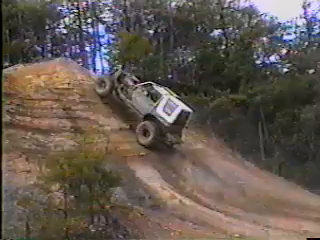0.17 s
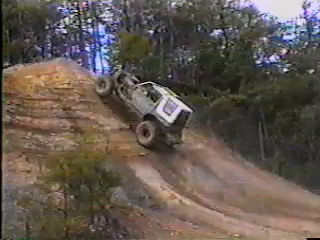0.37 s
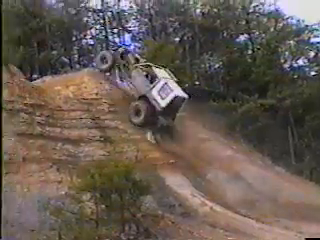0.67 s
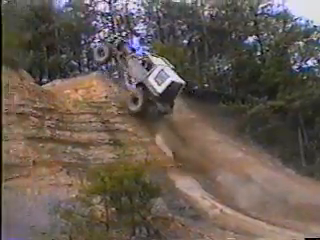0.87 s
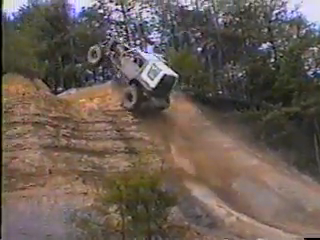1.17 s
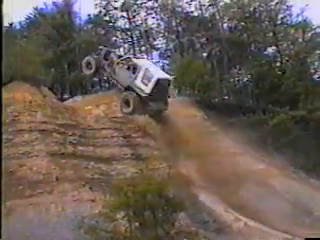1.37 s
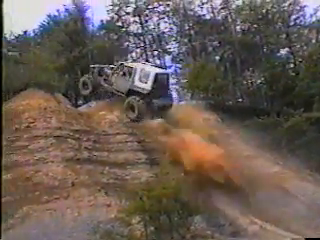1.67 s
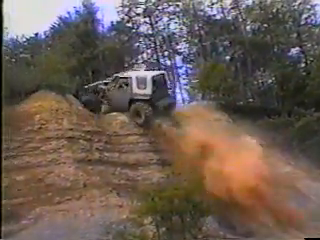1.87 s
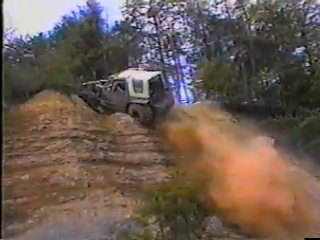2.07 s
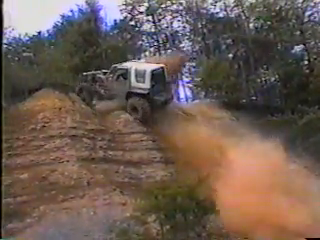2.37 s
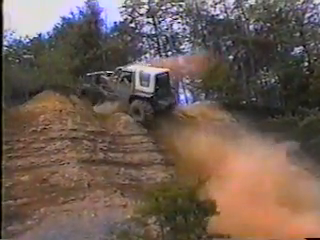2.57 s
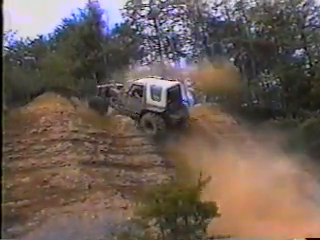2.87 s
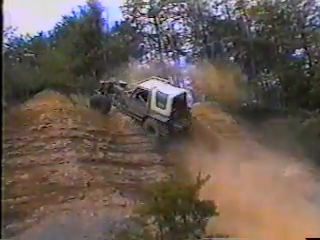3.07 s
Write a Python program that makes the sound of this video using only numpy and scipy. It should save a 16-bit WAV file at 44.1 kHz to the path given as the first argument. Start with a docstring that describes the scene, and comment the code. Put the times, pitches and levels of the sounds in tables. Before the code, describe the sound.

An off-road vehicle engine revs hard up a dirt hill, raspy and howling over the hiss of tyres spraying dirt. It eases, blips, pops and roars again, heard outdoors through a distant, slightly overloaded microphone.

```python
"""V8 off-roader on a dirt hill.

It climbs at full throttle, eases at the crest, blips, pops on the overrun and roars again.
Firings rasp and howl through an open exhaust pipe whose note rises with gas heat; tyres throw dirt.
Hillside and trees scatter the sound to a distant, overloaded mono microphone."""
import sys
import numpy as np
from scipy import signal
from scipy.fft import rfft, irfft, next_fast_len
from scipy.io import wavfile
from scipy.ndimage import uniform_filter1d, map_coordinates

SR = 44100
rng = np.random.default_rng(int(sys.argv[2]) if len(sys.argv) > 2 else 0)


def generate_wav(sig):
    """Save sig (samples, or channels by samples) to the path in sys.argv[1] as 16-bit PCM at SR."""
    pcm = np.round(np.clip(np.atleast_2d(sig).T, -1, 1) * 32767).astype(np.int16)
    wavfile.write(sys.argv[1], SR, pcm)


N = 141561

# four-stroke cycle rate: time_s, rate_hz
CYCLE_HZ = [(.05, 43.2), (.14, 42.9), (.21, 45.5), (.29, 47.8), (.38, 48.7), (.45, 48.6), (.54, 46.9),
            (.69, 45.9), (.76, 42.9), (.82, 42), (.89, 44), (.95, 48), (1.0, 53), (1.1, 55.6), (1.23, 54.6),
            (1.33, 56), (1.43, 55.4), (1.54, 51.8), (1.69, 39), (1.76, 41), (1.86, 43.3), (1.93, 43.6),
            (2.03, 42.2), (2.22, 40), (2.38, 42.5), (2.8, 32), (2.96, 38.8), (3.2, 45)]
# nominal lowest pipe resonance: time_s, pitch_hz
LOW_MODE_HZ = [(.05, 725), (.14, 770), (.22, 755), (.28, 720), (.43, 755), (.6, 715), (.8, 685), (.95, 630),
               (1.2, 590), (1.4, 615), (1.55, 590), (1.68, 545), (1.78, 620), (1.9, 705), (2.05, 650),
               (2.2, 610), (2.86, 550), (3.2, 630)]


def amp(db):
    """Decibels to gain."""
    return 10 ** (np.asarray(db) / 20)


def unit(x):
    """Scale to rms 1."""
    return x / np.sqrt(np.mean(x ** 2) + 1e-20)


def curve(rows):
    """One value per sample from rows of time_s, value."""
    return np.interp(np.arange(N) / SR, *np.transpose(rows))


def wobble(knots_per_s):
    """Smooth random curve."""
    return map_coordinates(rng.standard_normal(2048), [np.arange(N) * knots_per_s / SR], mode="wrap")


def filtered(x, response):
    """Apply a gain given as a function of frequency in Hz."""
    size = next_fast_len(N + 8192)
    return irfft(rfft(x, size) * response(np.fft.rfftfreq(size, 1 / SR)), size)[:N]


def coloured(x, spectrum):
    """Filter by rows of freq_hz, gain_db."""
    hz, db = np.transpose(spectrum)
    return filtered(x, lambda f: amp(np.interp(np.log(f + 1), np.log(hz), db)))


def noise(spectrum):
    """Coloured noise, rms 1."""
    return unit(coloured(rng.standard_normal(N), spectrum))


def steady(x, size=4001):
    """Level slow swells to rms 1."""
    power = uniform_filter1d(uniform_filter1d(x ** 2, size), size)
    return x / np.sqrt(np.abs(power) + 1e-12)


def order_tone(order, cycles, flutter_db=4.0, slip_rad=0.63):
    """One multiple of the cycle rate, unsteady in level and phase."""
    level = amp(flutter_db * wobble(13))
    return level * np.sin(2 * np.pi * (order * cycles + rng.random()) + slip_rad * wobble(30))


def hillside(x, count=27, t60_s=0.056, crossfade_s=0.12, echo_db=6.5):
    """Banks and trunks add a short, dense scatter that changes as the vehicle moves."""
    age_s = np.arange(SR // 6) / SR
    place = np.arange(N) / SR / crossfade_s
    tails = rng.standard_normal((count, len(age_s))) * amp(-60 * age_s / t60_s)
    echo = 0
    for k, tail in enumerate(tails):
        share = np.sqrt(np.maximum(1 - np.abs((place - k) % count - 1), 0))
        echo += signal.fftconvolve(x * share, tail / np.linalg.norm(tail))[:N]
    return x + amp(echo_db) * echo


def tyres(grit_per_s=260, grit_db=-20.5):
    """Spinning tyres spray dirt: hiss with clicks of grit."""
    # spray envelope: time_s, level_db
    spray_db = [(.06, -26), (.44, -26), (.52, -29.5), (.7, -29), (1.06, -26.5), (1.2, -25.5), (1.38, -26),
                (1.6, -27.5), (1.98, -25.5), (2.14, -34), (2.25, -33.5), (2.31, -38), (2.4, -30.5),
                (2.46, -37), (2.72, -37), (2.82, -34), (2.89, -26.5), (3.0, -28), (3.2, -27.5)]
    # spray colour: freq_hz, gain_db
    spectrum = [(100, -40.5), (300, -13), (1000, -9.5), (2000, -3), (3200, 0.5), (3800, -2.5), (4600, -0.5),
                (5000, -4.5), (5500, -13.5), (6400, -17.5), (7500, -28)]
    grit = (rng.random(N) < grit_per_s / SR) * rng.standard_normal(N)
    spray = rng.standard_normal(N) + amp(grit_db) * unit(hillside(grit))
    return unit(coloured(spray, spectrum)) * amp(curve(spray_db) + 1 + 0.7 * wobble(30.36))


def drone(cycles, rough):
    """Low engine orders, dissolving into rumble as firing gets uneven."""
    # low exhaust tones: order, level_db
    orders = [(4, -22.5), (5, -2), (6, -1.5), (7, -8.5), (8, 3), (9, -11), (10, -4), (12, -5.5)]
    # drone envelope: time_s, level_db
    drone_db = [(.06, -37.5), (.26, -40.5), (.37, -36), (.52, -42.5), (.9, -38.5), (1.29, -38.5),
                (1.58, -45), (1.77, -40.5), (2.0, -41.5), (2.2, -46.5), (2.36, -37), (2.5, -46), (2.7, -43),
                (3.0, -33), (3.2, -32.5)]
    # rumble colour: freq_hz, gain_db
    spectrum = [(30, -23), (65, -24.5), (105, -10), (150, -12), (210, -4.5), (300, 0.5), (500, -5),
                (1000, -6), (3000, -27)]
    tones = amp(-1) * unit(sum(amp(db) * order_tone(order, cycles) for order, db in orders))
    rumble = amp(-0.5) * noise(spectrum)
    return 2 * amp(curve(drone_db)) * ((1 - rough) * tones + rough * rumble)


def pops(attack_s=0.0017, t60_s=0.058):
    """Unburnt fuel cracks while the throttle is shut."""
    # overrun pops: start_s, level_db
    cracks = [(2.585, -39), (2.636, -31.5), (2.681, -32.5), (2.724, -34), (2.75, -32.5), (2.76, -28.5)]
    # pop colour: freq_hz, gain_db
    spectrum = [(100, -30.5), (400, -16), (1300, 1), (1600, 1.5), (1800, 10.5), (2050, -7), (2800, 4.5),
                (3350, 3.5), (3750, 3), (4800, -2), (5600, -2.5), (7500, -47)]
    envelope = np.zeros(N)
    for start_s, db in cracks:
        age_s = np.maximum(np.arange(N) / SR - start_s, 0)
        envelope += amp(db - 60 * age_s / t60_s) * (1 - np.exp(-age_s / attack_s))
    return 2 * envelope * noise(spectrum)


def wails(flutter_db=3, slip_rad=0.8):
    """Brief, ragged exhaust tones as the load changes."""
    # gliding tones: start_s, length_s, start_hz, end_hz, level_db
    glides = [(0.605, 0.2, 905, 785, -29.5), (0.771, .28, 1000, 898, -32), (1.029, .11, 800, 793, -28),
              (1.247, 0.19, 770, 800, -28.5), (1.718, 0.0484, 2220, 2456, -22.5),
              (2.733, 0.052, 1030, 990, -39), (2.771, 0.11, 462, 444, -35), (2.841, 0.22, 550, 603, -31),
              (2.825, 0.161, 1020, 1090, -33.5), (2.929, .24, 1240, 1350, -35)]
    out = np.zeros(N)
    for start_s, length_s, start_hz, end_hz, db in glides:
        progress = np.clip((np.arange(N) / SR - start_s) / length_s, 0, 1)
        turns = np.cumsum(start_hz + (end_hz - start_hz) * progress) / SR
        envelope = amp(db + flutter_db * wobble(120)) * np.sin(np.pi * progress)
        out += envelope * np.sin(2 * np.pi * turns + slip_rad * wobble(90))
    return out


def howl(cycles, width_hz=95):
    """Engine orders stand out as they cross the pipe's lowest resonance."""
    # howling tones: order, level_db
    orders = [(11, 3), (12, -6), (13, -9), (14, -2), (15, 7), (16, 4), (17, 3.5), (18, 6), (19, -3)]
    # howl envelope: time_s, level_db
    howl_db = [(.05, -31), (.15, -26), (.24, -30.5), (.31, -37), (.41, -30), (.5, -34), (.68, -30),
               (.8, -24.5), (.9, -37), (1.04, -38), (1.17, -41), (1.26, -34), (1.38, -30.5), (1.5, -36),
               (1.58, -42), (1.7, -39), (1.77, -28.5), (1.84, -34), (1.91, -31.5), (2.02, -37), (2.13, -41),
               (2.26, -50), (2.6, -58), (2.9, -46), (3.2, -39)]
    cycle_hz, mode_hz = curve(CYCLE_HZ), curve(LOW_MODE_HZ)
    tones = 0
    for order, db in orders:
        detuning = 2 * (order * cycle_hz - mode_hz) / width_hz
        tone = order_tone(order, cycles, flutter_db=3.0, slip_rad=0.56)
        tones += amp(db) * tone / np.hypot(1, detuning)
    return steady(tones) * amp(curve(howl_db))


def firings(cycles, rough, jitter=0.098, puff_depth=0.31):
    """One pressure pulse and one puff of turbulent gas per firing."""
    # cylinders in firing order: level_db, delay_intervals
    cylinders = [(-10.5, 0.0041), (-7, 0.088), (-1.5, -0.054), (-6.5, 0.07), (-19.5, -0.052), (-3.5, .04),
                 (-3, 0.163), (-6, -0.091)]
    count = len(cylinders)
    turns = cycles * count
    index = np.arange(int(cycles[-1] * count))
    level_db, delay = np.array(cylinders)[index % count].T
    timing_scatter, level_scatter = rng.standard_normal((2048, 2))[index].T
    due = np.interp(index + delay, turns, np.arange(N)).astype(int)
    onsets = np.interp(index + delay + jitter * rough[due] * timing_scatter, turns, np.arange(N))
    sizes = amp(level_db + 0.51 * level_scatter)
    taps = onsets.astype(int)[:, None] + np.arange(-7, 9)
    shapes = sizes[:, None] * np.sinc(taps - onsets[:, None])  # band-limited pulses
    pulses = np.bincount(taps.clip(0, N - 1).ravel(), shapes.ravel(), N)
    turbulence = rng.standard_normal(N) * np.interp(turns, index, sizes)
    puffs = turbulence * (1 + puff_depth * np.cos(2 * np.pi * turns))
    return np.sqrt(1 - rough) * unit(pulses) + np.sqrt(rough) * unit(puffs)


def resonance(x, centre_hz, width_hz):
    """One pipe mode with a moving centre."""
    carrier = np.exp(2j * np.pi * np.cumsum(centre_hz) / SR)
    pole = np.exp(-np.pi * width_hz / SR)
    return (signal.lfilter([1 - pole], [1, -pole], x / carrier) * carrier).real


def pipe_ring(gas, cycles, swing=0.03, wander=0.0063):
    """Upper pipe modes; their note swings with each cycle's surge of gas."""
    # mode spacing: time_s, pitch_hz
    spacing_hz = [(.05, 674), (.4, 695), (.7, 700), (.88, 704), (1.0, 719), (1.11, 712), (1.21, 622),
                  (1.32, 720), (1.43, 714), (1.53, 706), (1.66, 574), (1.74, 572), (1.8, 693), (1.92, 720),
                  (2.03, 689), (2.25, 614), (2.4, 616), (2.87, 527), (3.0, 592), (3.2, 689)]
    # upper modes: note_multiple, width_hz, level_db
    modes = [(2.02, 178, -3), (3.08, 84, 3.5), (3.95, 138, 1)]
    # mode near 1.4 kHz: time_s, gain_db
    bark_db = [(.05, -1), (.25, 2), (.5, -7.5), (.7, 2.5), (.9, -8), (1.05, -4.5), (1.3, 6), (1.5, -3),
               (1.9, -3), (3.2, -6)]
    # mode near 2.8 kHz: time_s, gain_db
    snarl_db = [(.05, 1.5), (.55, 2.5), (.82, 0), (1.0, -1), (1.15, 2), (1.3, 2), (1.47, 3.5), (1.7, -2),
                (1.82, 1.5), (2.0, 4), (2.3, 1), (3.2, -1.5)]
    # ring colour: freq_hz, gain_db
    spectrum = [(200, -42.5), (700, -26.5), (1300, 0.5), (3200, -2), (4500, -6), (6000, -23)]
    note_hz = curve(spacing_hz) * (1 + swing * np.sin(2 * np.pi * cycles) + wander * wobble(76))
    swell_db = [curve(bark_db), 0, curve(snarl_db)]
    ring = 0
    for k, (multiple, width_hz, db) in enumerate(modes):
        ring += (-1) ** k * amp(db + swell_db[k]) * resonance(gas, multiple * note_hz, width_hz)
    return steady(coloured(ring, spectrum))


def pipe_boom(gas):
    """Firings drive the lowest pipe mode, just below its nominal pitch."""
    # boom envelope: time_s, level_db
    boom_db = [(.06, -28), (.15, -30.5), (.3, -32), (.42, -28.5), (.53, -29.5), (.79, -39), (.92, -27.5),
               (1.08, -28), (1.17, -32.5), (1.35, -27), (1.55, -35), (1.68, -35.5), (1.77, -27.5),
               (1.86, -36), (2.0, -40.5), (2.2, -47), (2.34, -35), (2.48, -47), (2.62, -43.5), (2.8, -46),
               (2.9, -34), (3.2, -33.5)]
    # boom colour: freq_hz, gain_db
    spectrum = [(200, -26.5), (400, -12.5), (600, -6), (800, -11), (1100, -5), (1600, -24.5), (3000, -41)]
    boom = resonance(gas, 0.937 * curve(LOW_MODE_HZ), width_hz=160)
    return steady(coloured(boom, spectrum)) * amp(curve(boom_db) - 3.5)


def exhaust(cycles, rough):
    """Firings rasp through the open pipe and ring it; uneven firing favours the rasp."""
    # rasp and ring envelope: time_s, level_db
    throttle_db = [(.06, -26), (.3, -26), (.45, -26.5), (.6, -30.5), (.75, -26), (.88, -26), (.98, -24.5),
                   (1.09, -26), (1.19, -34.5), (1.32, -24.5), (1.49, -26), (1.58, -33.5), (1.71, -28),
                   (1.8, -23.5), (1.95, -26.5), (2.02, -27), (2.12, -37.5), (2.24, -37), (2.3, -22),
                   (2.39, -27), (2.48, -40), (2.7, -47), (2.81, -45), (2.9, -29), (3.06, -25), (3.2, -23)]
    # rasp colour: freq_hz, gain_db
    spectrum = [(100, -64.5), (400, -15.5), (700, -4), (1050, -5), (1450, -1), (1800, -22.5), (2200, -4.5),
                (2800, -4.5), (3400, -8.5), (4600, -7.5), (5500, -23), (7500, -34)]
    gas = hillside(firings(cycles, rough))
    rasp = amp(-3.5) * np.sqrt(0.32 + rough) * steady(coloured(gas, spectrum))
    ring = amp(0.5) * np.sqrt(1 - rough) * pipe_ring(gas, cycles)
    return (rasp + ring) * amp(curve(throttle_db) + 0.61 * wobble(24.43)) + pipe_boom(gas)


def scene():
    """Engine and tyres, same in both channels."""
    # firing unevenness: time_s, rough_fraction
    roughness = [(.05, 0.41), (.6, 0.41), (.8, 0.43), (.98, 0.4), (1.1, 0.47), (1.19, 0.42), (1.32, 0.42),
                 (1.48, 0.2), (1.62, .7), (1.72, 0.3), (1.8, 0.19), (2.03, .15), (2.15, 0.84), (2.4, 0.79),
                 (3.2, .7)]
    rough = curve(roughness)
    cycles = np.cumsum(curve(CYCLE_HZ)) / SR
    mono = exhaust(cycles, rough) + howl(cycles) + drone(cycles, rough) + wails() + tyres() + pops()
    return np.array([mono, mono])


def record(dry, overload_db=-12.5, start_s=0.0445, cutoff_hz=7666):
    """Mono microphone: rounded peaks, thin bass, no high treble; silent until start_s."""
    # freq_hz, gain_db
    response = [(20, -2.0), (70, -22), (170, -2.5), (5000, 1.5),
                (5600, -0.5), (6500, -4.5), (7200, -12), (7700, -21.0)]
    clipped = dry[0] / (1 + np.abs(dry[0] / amp(overload_db)) ** 4) ** (1 / 4)
    gated = coloured(clipped, response) * (np.arange(N) / SR > start_s)
    mono = filtered(gated, lambda f: np.clip((cutoff_hz - f) / 200 + 0.5, 0, 1))
    return np.array([mono, mono])


dry = scene()
out = record(dry)
generate_wav(out)
```